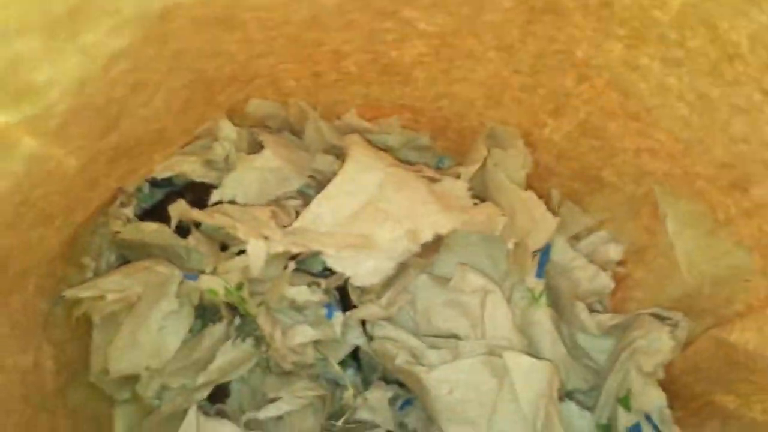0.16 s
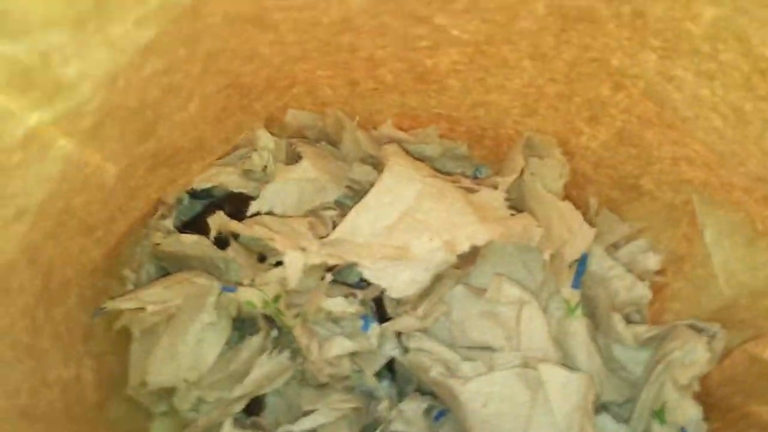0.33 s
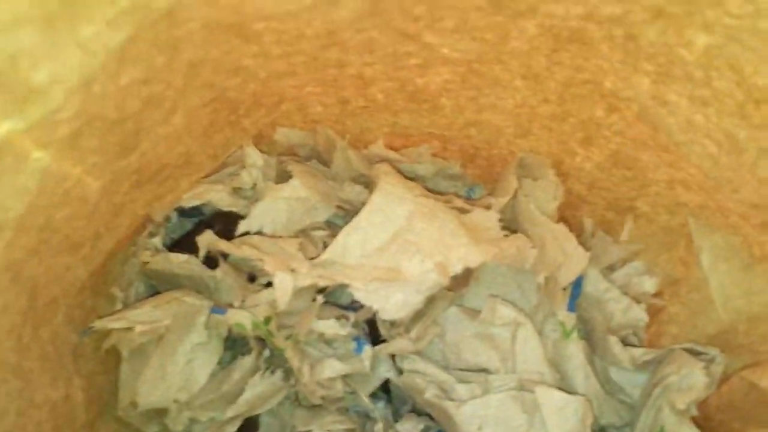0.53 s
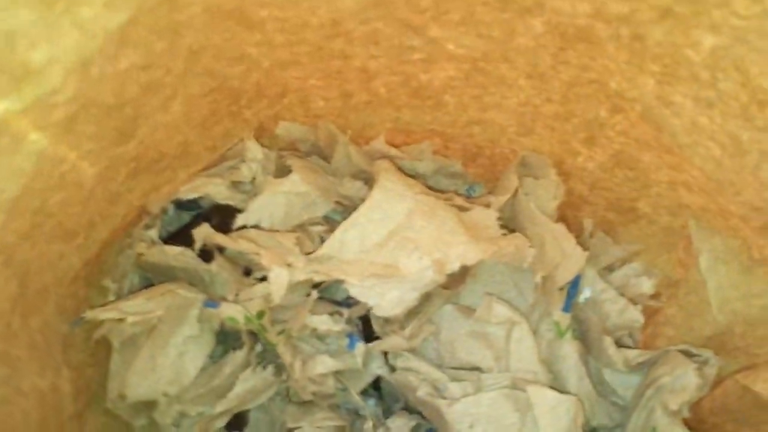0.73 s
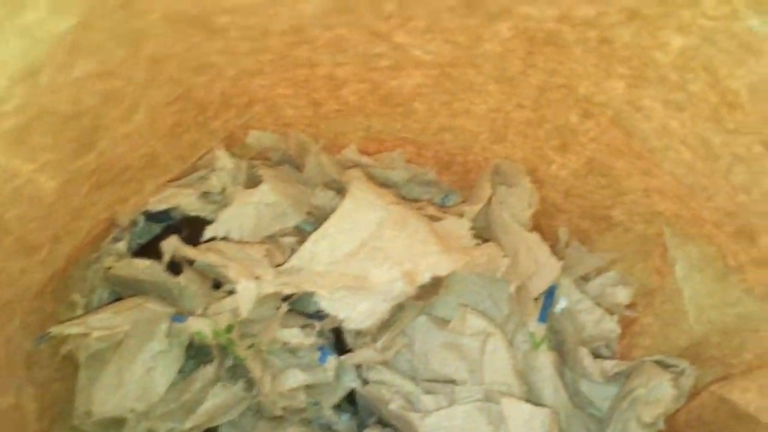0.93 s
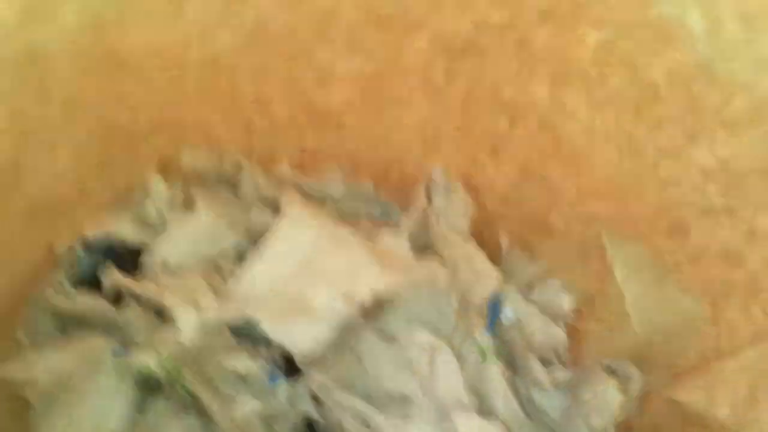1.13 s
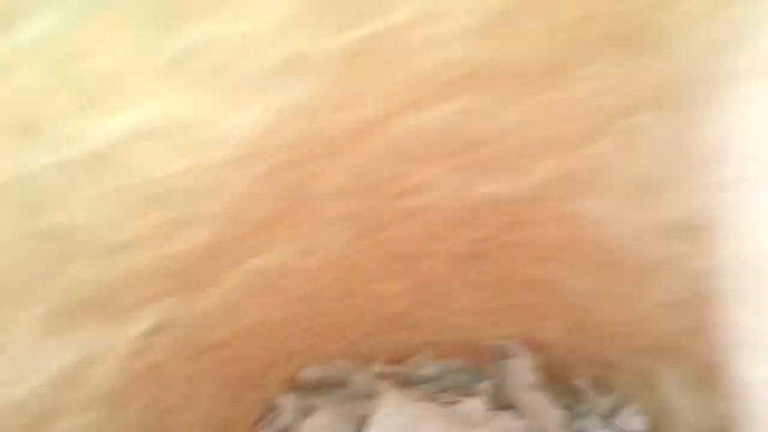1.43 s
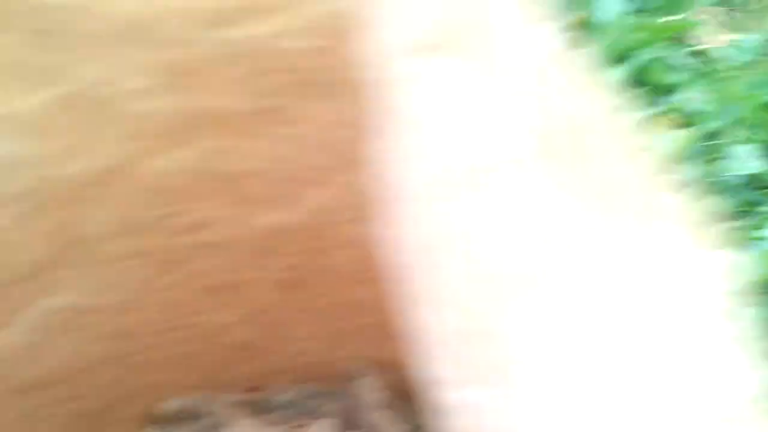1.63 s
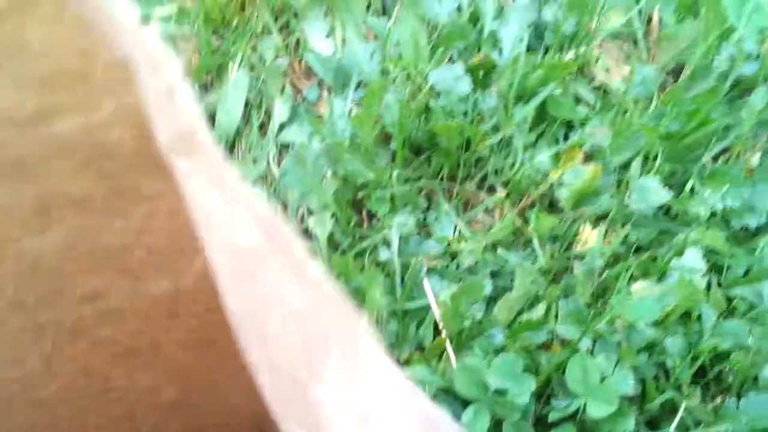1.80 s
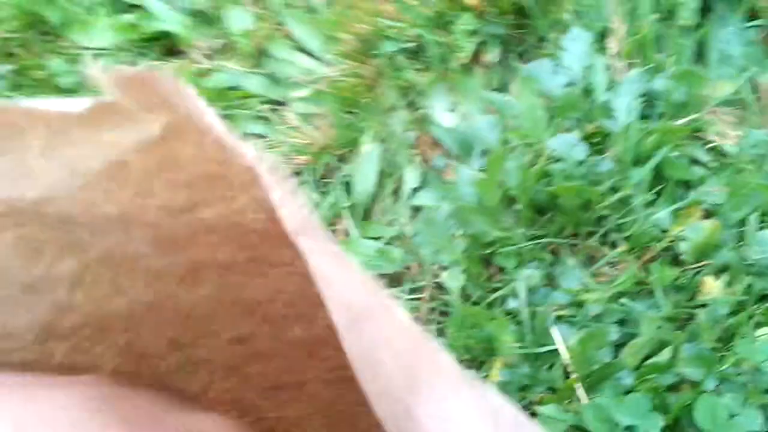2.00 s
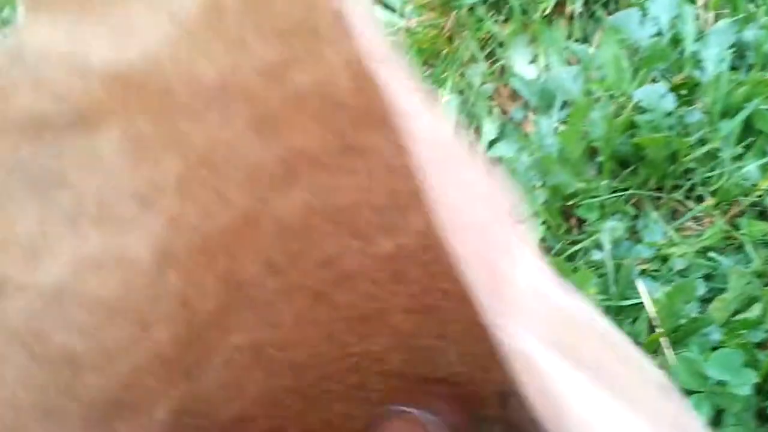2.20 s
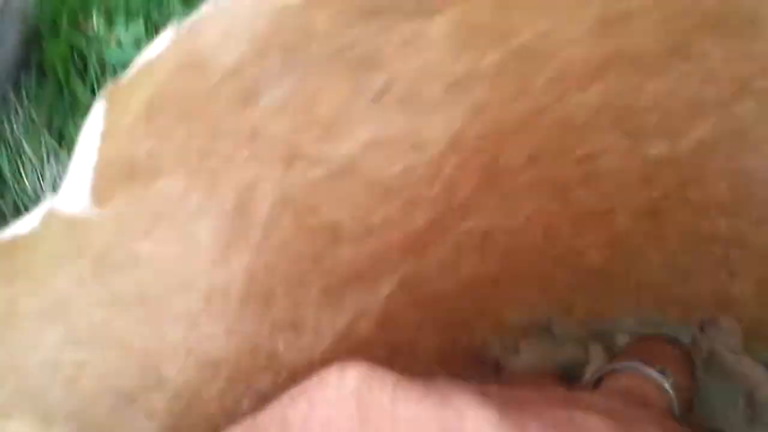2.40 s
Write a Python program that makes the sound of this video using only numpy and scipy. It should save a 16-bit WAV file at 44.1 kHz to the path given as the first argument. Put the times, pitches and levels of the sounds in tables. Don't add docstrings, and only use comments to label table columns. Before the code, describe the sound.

Stiff paper bag of crumpled scraps rustling and crackling close up, handled outdoors on grass

```python
import sys
import numpy as np
from scipy import signal
from scipy.fft import rfft, irfft
from scipy.io import wavfile

SR = 44100
rng = np.random.default_rng(int(sys.argv[2]) if len(sys.argv) > 2 else 0)


def volts(x):
    e = np.asarray(x, float) / 20
    return 10 ** e


def wav_out(sig):
    wavfile.write(sys.argv[1], SR, np.round(np.clip(np.atleast_2d(sig).T, -1, 1) * 32767).astype(np.int16))


N = 112454


def rms_one(x):
    return x / np.sqrt(np.mean(x ** 2) + 1e-20)


def colour(x, points):
    hz, db = np.transpose(points)
    grid = np.maximum(np.fft.rfftfreq(len(x), 1 / SR), 1)
    gain = volts(np.interp(np.log(grid), np.log(hz), db))
    return irfft(rfft(x) * gain, len(x))


def band_pass(x, low_hz, high_hz):
    return signal.sosfilt(signal.butter(2, [low_hz, high_hz], "band", fs=SR, output="sos"), x)


def resonance(x, hz, width_hz):
    r = np.exp(-np.pi * width_hz / SR)
    poles = [1, -2 * r * np.cos(2 * np.pi * hz / SR), r * r]
    return signal.lfilter((1 - r * r) / 2 * np.array([1, 0, -1]), poles, x)


def drift(rate_hz):
    r = np.exp(-2 * np.pi * rate_hz / SR)
    settle = 4000
    wander = signal.lfilter([1], [1, -2 * r, r * r], rng.standard_normal(N + settle))
    return rms_one(wander[settle:])


def grains(per_s, spread_db):
    sizes = volts(spread_db * np.minimum(rng.exponential(1, N), 4)) * rng.choice([-1, 1], N)
    return sizes * (rng.random(N) < per_s / SR)


# (frequency [Hz], level per Hz [dB])
HUSH_COLOUR = [(12, -19), (20, -2), (157, -5.5), (276, -11.5), (944, -16), (1050, -16.5), (12000, -21.5),
               (15600, -67), (22000, -120)]


def hush():
    air = rms_one(colour(rng.standard_normal(N), HUSH_COLOUR))
    return volts(-55 + 1.0 * drift(1.0)) * air


# (time [s], peak level [dB], length [s])
AIR_PUFFS = [
    (0.255, -39.5, 0.072),
    (1.068, -45, 0.082),
    (1.71, -57.5, 0.16),
    (1.997, -48, 0.034),
    (2.034, -42.5, 0.059),
    (2.18, -56, 0.29),
]


def puffs():
    t = np.arange(N) / SR
    air = rms_one(band_pass(rng.standard_normal(N), 25, 105.5))
    swells = sum(volts(db) * np.exp(-(2 * (t - s) / length) ** 2) for s, db, length in AIR_PUFFS)
    return air * swells


# (frequency [Hz], level [dB], time to fall 60 dB [s])
WALL_MODES = [(96, -7, 0.031), (127.3, -4.5, 0.078), (243.6, 1.5, 0.034), (386, -3, 0.027),
              (533, -2.5, 0.024), (717, -5, 0.026), (1065, -4, 0.013), (1242, -7.5, 0.03)]


def wall(clicks):
    out = 0
    for row, (hz, level_db, t60) in zip(clicks, WALL_MODES):
        r, w = volts(-60 / (t60 * SR)), 2 * np.pi * hz / SR
        poles = [1, -2 * r * np.cos(w), r * r]
        out = out + volts(level_db) * signal.lfilter([0, np.sin(w)], poles, row + 1e-18)
    return signal.sosfilt(signal.butter(2, 42, "high", fs=SR, output="sos"), out)


# (time [s], level [dB])
HOLD_LEVEL = [(0, -47), (.1, -53), (.3, -39), (.39, -57), (.44, -44), (.58, -46.5), (.68, -55.5),
              (.79, -54.5), (.9, -47), (1.06, -37.5), (1.22, -45.5), (1.33, -60.5), (1.9, -66.5),
              (2.55, -54.5)]


def hold():
    knocks_per_s, knock_spread_db, lump_db, lumps_per_s = 370, 4.3, 2.0, 12.5
    modes = len(WALL_MODES)
    knocks = grains(knocks_per_s * modes, knock_spread_db) * volts(lump_db * drift(lumps_per_s))
    dealt = rng.integers(0, modes, N)
    rumble = rms_one(wall([knocks * (dealt == k) for k in range(modes)]))
    s, db = np.transpose(HOLD_LEVEL)
    return volts(-0.5 + np.interp(np.arange(N) / SR, s, db)) * rumble


# (frequency [Hz], level per Hz [dB])
PAPER_COLOUR = [(120, -30), (200, -8.5), (675, -2.5), (919, 0), (2240, -1.5), (6700, -0.5), (12000, -10.5),
                (15600, -39), (22000, -120)]


def paper(x):
    return colour(x, PAPER_COLOUR)


# (start [s], firmest time [s], end [s], rms level [dB], ring [Hz])
RUBS = [(0.132, .155, 0.18, -36, 6200), (0.172, 0.213, 0.27, -33.5, 5940), (0.245, 0.318, 0.342, -35, 5620),
        (0.335, .37, .42, -48.5, 6100), (0.532, 0.536, 0.561, -32.5, 6250),
        (0.893, 0.89, 0.96, -48.5, 3100), (1.884, 1.915, 1.98, -59.5, 6450),
        (2.33, 2.394, 2.405, -47.5, 4200), (1.004, 1.014, 1.074, -33, 6650),
        (1.028, 1.05, 1.08, -31.5, 6700), (1.062, 1.075, 1.112, -33, 5550), (1.08, 1.1, 1.16, -39, 7240),
        (1.232, 1.258, 1.278, -33.5, 6000), (1.269, 1.3, 1.32, -31, 5440), (2.275, 2.28, 2.31, -45, 5330),
        (1.316, 1.327, 1.367, -43, 5950), (1.583, 1.614, 1.62, -43.5, 6120)]
SWEEPS = [(0, .018, .047, -40.5, 6000), (.047, .08, .11, -48.5, 4520), (0.108, .118, 0.12, -39.5, 5600),
          (0.422, 0.5, 0.58, -40.5, 6430), (0.585, 0.626, 0.83, -50, 5560), (0.838, 0.856, 0.87, -46, 7500),
          (0.889, 0.888, .96, -39.5, 7700), (0.957, 0.996, 1.017, -40, 6700),
          (1.022, 1.109, 1.163, -34, 6300), (1.38, 1.44, 1.56, -50.5, 5560),
          (1.44, 1.468, 1.505, -46.5, 5650), (1.981, 1.984, 2.01, -41.5, 5500),
          (1.999, 2.0115, 2.023, -28.5, 5350), (2.014, 2.019, 2.04, -44, 5500),
          (2.03, 2.058, 2.22, -45.5, 5900), (2.119, 2.13, 2.14, -31.5, 6400),
          (2.139, 2.147, 2.173, -27, 5850), (2.16, 2.167, 2.188, -28.5, 6160),
          (2.187, 2.255, 2.29, -30.5, 6270), (2.28, 2.31, 2.47, -45.5, 5430),
          (2.409, 2.421, 2.432, -42, 5950), (2.458, 2.465, 2.473, -39.5, 5750),
          (2.479, 2.5, 2.51, -41, 5530), (2.51, 2.535, 2.56, -36, 5760)]
SKIMS = [
    (2.072, 2.076, 2.094, -33.5, 5100),
    (2.092, 2.099, 2.104, -24, 5600),
    (2.106, 2.1105, 2.116, -21, 5800),
    (1.015, 1.09, 1.08, -39.5, 6400),
]
DRAGS = [
    (.655, 0.75, .77, -58, 7300),
    (1.12, 1.216, 1.286, -39.5, 6100),
    (.861, .864, .868, -42.5, 7500),
]


def strokes():
    patch_db, patches_per_s = 2.0, 45
    edge_db, fade_s = -9, 0.004
    clumping_db = -0.5 * drift(550) + 1.1 * drift(70)
    slips = rms_one(grains(6000, 1.5) * volts(clumping_db))

    sliding = paper(slips)
    edges = 100 * 2 ** np.arange(0, 7.6, .75)
    broad = 0
    for k, (low_hz, high_hz) in enumerate(zip(edges, edges[1:])):
        patches = volts(patch_db * drift(patches_per_s))
        broad = broad + (-1) ** k * patches * band_pass(sliding, low_hz, high_hz)
    broad = rms_one(broad)
    ring_slips = slips * rng.choice([-1, 1], N) * volts(patch_db * drift(patches_per_s))

    # (table, ring width [Hz], ring level over the broad part [dB])
    kinds = [(RUBS, 1300, 2), (SWEEPS, 3080, 0.51), (SKIMS, 6000, 13.4), (DRAGS, 820, 6.6)]
    out, t = np.zeros(N), np.arange(N) / SR
    for table, width_hz, ring_db in kinds:
        for start, firmest, end, db, hz in table:
            part = (t >= start - fade_s) & (t < end + fade_s)
            swell = volts(db + np.interp(t[part], [start, firmest, end], [edge_db, 0, edge_db]))
            fade = np.interp(t[part], [start - fade_s, start, end, end + fade_s], [0, 1, 1, 0]) ** 2
            ringing = resonance(resonance(ring_slips[part], hz, width_hz), hz, width_hz)
            sound = rms_one(broad[part]) + volts(ring_db) * rms_one(ringing)
            out[part] += swell * fade * rms_one(sound)
    return out


# (time [s], peak level [dB], ring [Hz], thump against the snap [dB])
CRACK = [
    (.2266, -2, 6560, -31),
    (.2289, -7, 5960, -32),
    (.2325, -6.5, 4120, -12.5),
    (.2340, -4, 6200, -36),
    (.2359, -9, 5800, 0.5),
]
MORE_SNAPS = [
    (0.8215, -41, 6500, -22),
    (0.8309, -22, 7340, -4),
    (1.169, -26, 4130, -38),
    (1.205, -29, 1720, -11),
    (2.264, -22, 1000, -20),
    (2.394, -33.5, 1930, -25),
    (2.498, -29, 1850, -16),
]
GRIP_SNAPS = [(0.1183, -22.5, 5940, -43), (0.1408, -28, 6500, -18), (0.3877, -31.5, 6140, -13),
              (0.4159, -28, 5370, -26), (0.4244, -13, 7100, -22), (0.4289, -10.5, 7240, -17.5),
              (0.4375, -20, 5440, -14), (0.4471, -17.5, 7260, -15), (0.4555, -22.5, 5260, -12.5),
              (0.463, -21, 5000, -30), (0.486, -16, 4030, -17), (0.4907, -14.5, 5050, -24.5),
              (0.4945, -18.5, 2410, -12), (0.5034, -23, 7660, -8), (0.513, -29, 7400, -5),
              (0.5246, -30.5, 2950, -15), (0.5357, -18, 6220, -20), (0.5504, -20.5, 7200, -14),
              (0.566, -20.5, 7600, -33), (0.5707, -20.5, 8100, -17)]
SHIFT_SNAPS = [(.616, -31, 1520, 5.5), (0.6202, -32.5, 2270, 6.5), (0.6524, -32.5, 3270, -19),
               (0.6635, -32.5, 3960, -4), (0.698, -27, 7090, -41), (0.7468, -31, 5400, -25),
               (0.7738, -35, 6000, -10), (0.8072, -44, 4500, -1), (0.8355, -24, 7100, -12),
               (0.8621, -32, 7750, -20), (0.889, -31.5, 3000, -4.5), (1.013, -19.5, 6650, -19),
               (1.1369, -21.5, 7200, -8), (1.1567, -21.5, 4900, -16), (1.1812, -26, 6100, -33),
               (1.3263, -24.5, 6100, -31), (1.3376, -29, 6140, -25), (1.354, -31, 6350, -36),
               (1.366, -35.5, 6040, -29)]
REACH_SNAPS = [(1.4444, -29.5, 7150, -38), (1.4876, -35.5, 2140, -25), (1.5305, -28, 7140, -32),
               (1.707, -39, 3600, -28), (1.782, -48, 5600, -38), (1.7636, -34, 4840, -29),
               (1.835, -41, 6820, -38), (1.9706, -33.5, 6600, -12), (2.0112, -17, 5900, -37),
               (2.0702, -30, 5800, -32), (2.1479, -20.5, 5350, -14), (2.120, -24, 5770, -35),
               (2.5444, -22, 4300, -3.5)]
DRY_SNAPS = [(.8275, -15, 7600, -4.5), (.8279, -19.5, 3100, -9), (1.7499, -29.5, 3400, -36),
             (1.8731, -32.5, 2460, -37), (2.3049, -20, 1200, -4.5), (2.3056, -21, 4100, -20),
             (2.3085, -30, 1100, -18), (0.86, -30, 5900, -27), (1.9997, -18, 5100, -24),
             (2.1818, -17.5, 4200, -29), (2.46, -36, 6100, -32), (0.93, -22, 4800, -34),
             (1.1, -23, 4100, -29), (2.3, -30, 1500, -18), (1.100, -25, 4000, -25)]
# (time [s], peak level [dB], ring [Hz])
TICKS = [(.0175, -30, 1480), (.052, -33.5, 6300), (0.079, -35, 3980), (.134, -25, 7000),
         (0.4702, -29, 5200), (0.5286, -25, 7400), (0.733, -36, 4500), (.806, -38, 600),
         (1.4395, -38, 3500), (1.494, -36, 8000), (1.518, -35, 3500), (1.522, -38, 7000),
         (1.534, -34, 7000), (1.550, -40, 7000), (1.624, -37, 5985), (1.728, -38, 6000), (2.533, -36, 1500),
         (2.440, -34.5, 1200)]


def snaps():
    rise_s, broad_db, reach = 0.00014, -1.5, 1.97
    thump_db_all, thump_spread_db = -3, 2.2
    lifted_s, lifted_db_per_octave = 1.4, 9
    crack_end_s = CRACK[-1][0] + .01

    creases = [*CRACK, *MORE_SNAPS, *GRIP_SNAPS, *SHIFT_SNAPS, *REACH_SNAPS]
    dry_ones = [*DRY_SNAPS, *[(*tick, -60) for tick in TICKS]]
    # (events, time to fall 60 dB [s], ring width [Hz])
    kinds = [(creases, 0.009, 310), (dry_ones, 0.007, 790)]

    modes = len(WALL_MODES)
    mode_hz = np.array(WALL_MODES)[:, 0]
    lows_lost_db = lifted_db_per_octave * np.log2(mode_hz[-1] / mode_hz)
    grip_damping_db = 2.5 * (np.arange(modes) < 2)

    length = 1024
    t = np.arange(length) / SR
    out, clicks = np.zeros(N + length), np.zeros((modes, N))
    for events, t60, width_hz in kinds:
        for s, db, hz, thump_db in events:
            puff = rng.standard_normal(length) * (1 - np.exp(-t / rise_s)) * volts(-60 * t / t60)
            ring = rms_one(resonance(puff, hz, width_hz))
            dulling = signal.butter(2, np.clip(reach * hz, 2000, .45 * SR), fs=SR)
            broad = rms_one(signal.lfilter(*dulling, paper(puff)))
            sound = ring + volts(broad_db) * broad
            i = int(s * SR)
            out[i:i + length] += volts(db) * sound / np.abs(sound).max()

            kick_db = db + thump_db + thump_db_all + thump_spread_db * rng.standard_normal(modes)
            kick_db = kick_db - grip_damping_db
            if s > lifted_s or s < crack_end_s:
                kick_db = kick_db - lows_lost_db
            clicks[:, i] += volts(kick_db) * rng.choice([-1, 1], modes)
    return out[:N] + wall(clicks)


def scene():
    return np.tile(hush() + puffs() + hold() + strokes() + snaps(), (2, 1))


def low_pass(x):
    return signal.sosfilt(signal.butter(12, 12310, fs=SR, output="sos"), x)


def record(dry):
    roll_off_hz, cutoff_hz = 11870 * .97, 11950
    mix = signal.sosfilt(signal.cheby1(6, .5, roll_off_hz, fs=SR, output="sos"), dry)
    mix = signal.sosfilt(signal.ellip(12, .5, 60, cutoff_hz, fs=SR, output="sos"), mix)
    return low_pass(mix)


dry = scene()
out = record(dry)
wav_out(out)
```